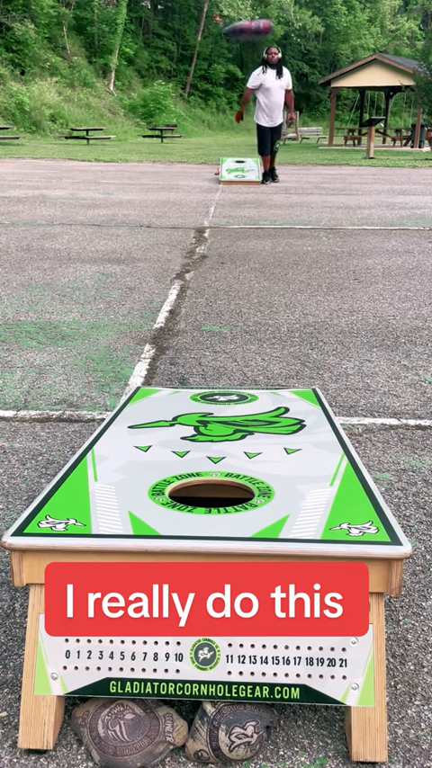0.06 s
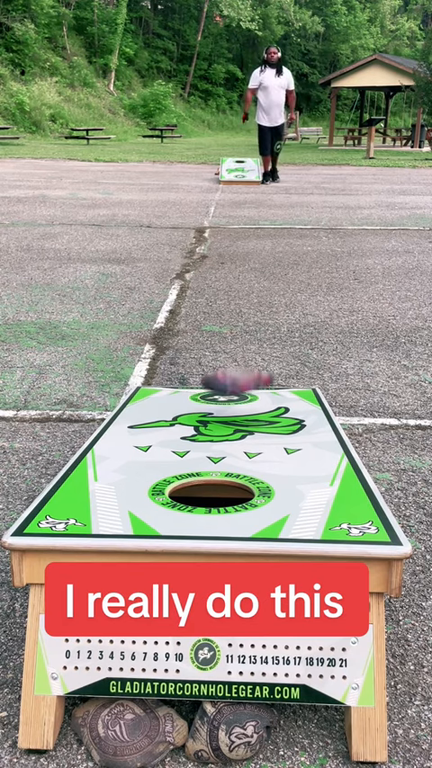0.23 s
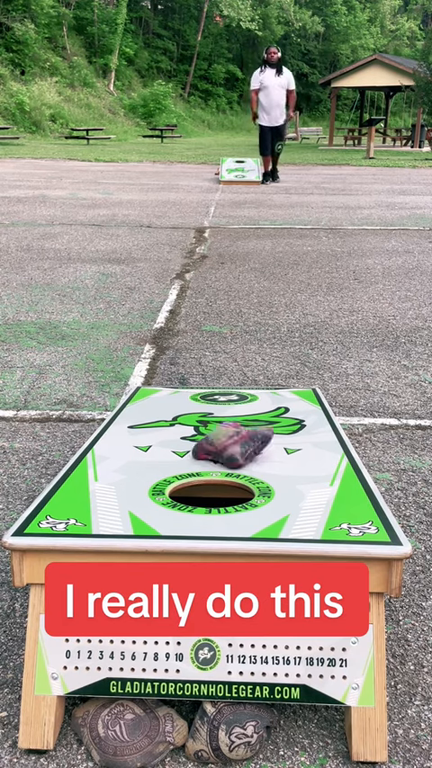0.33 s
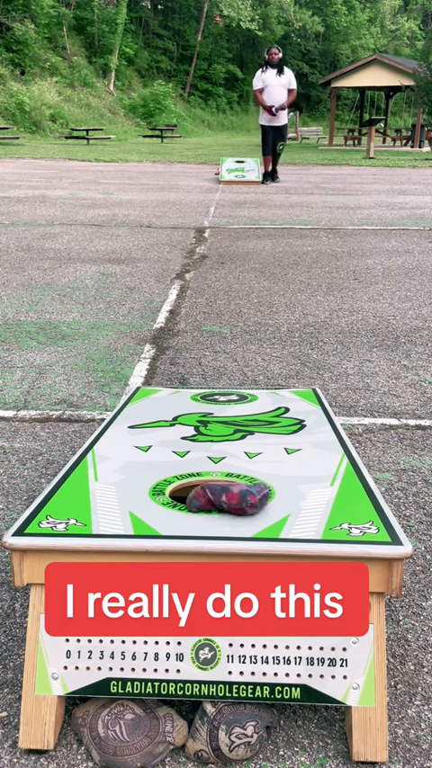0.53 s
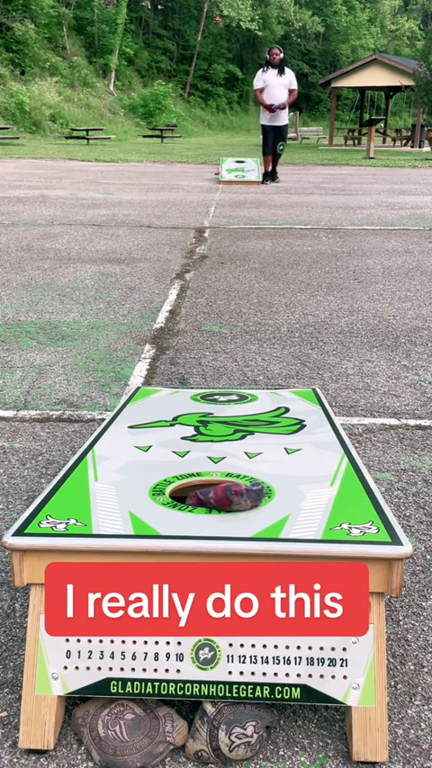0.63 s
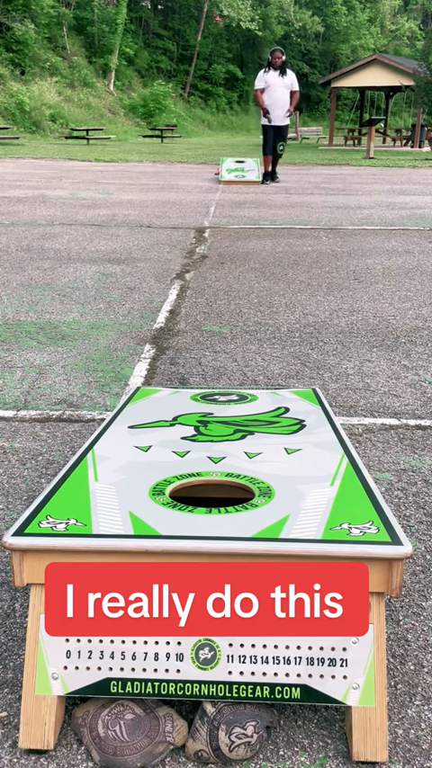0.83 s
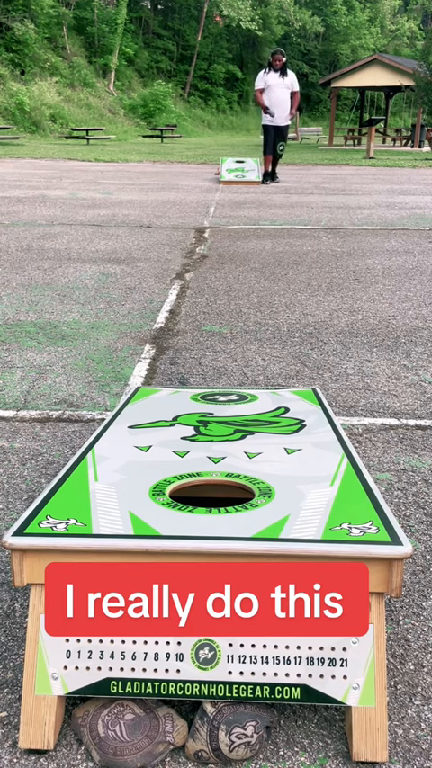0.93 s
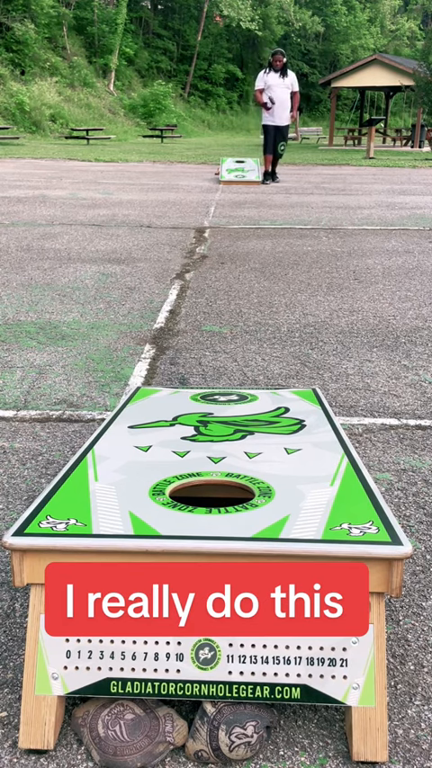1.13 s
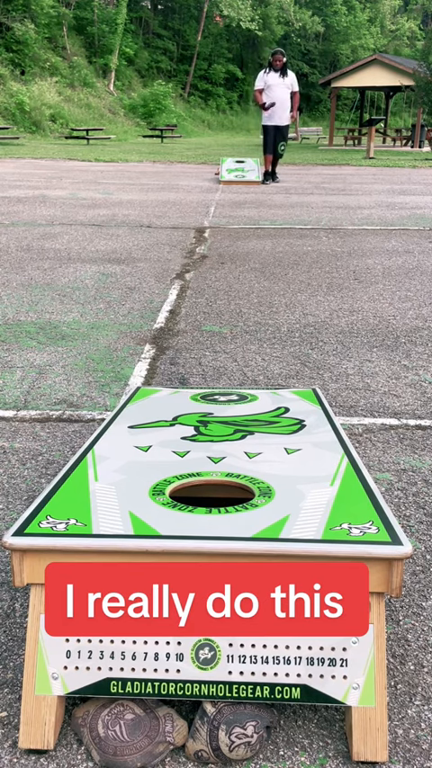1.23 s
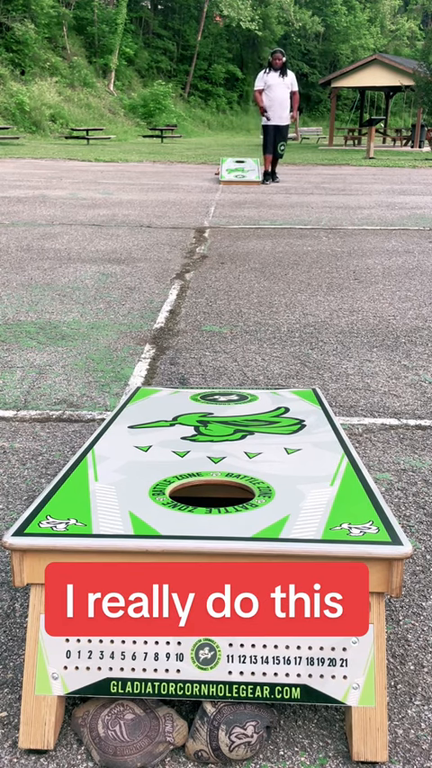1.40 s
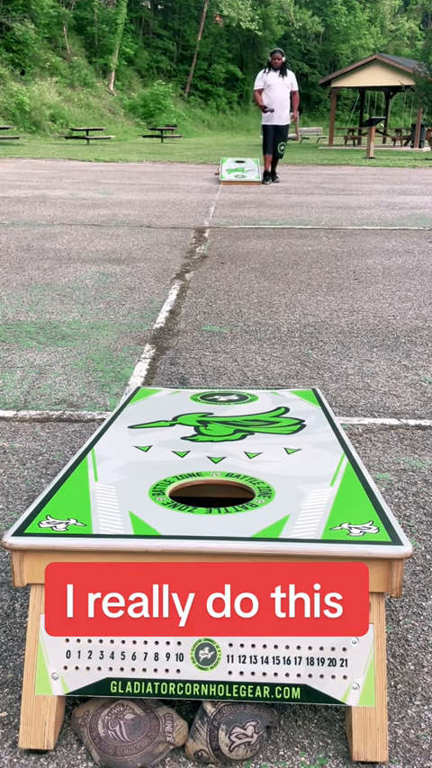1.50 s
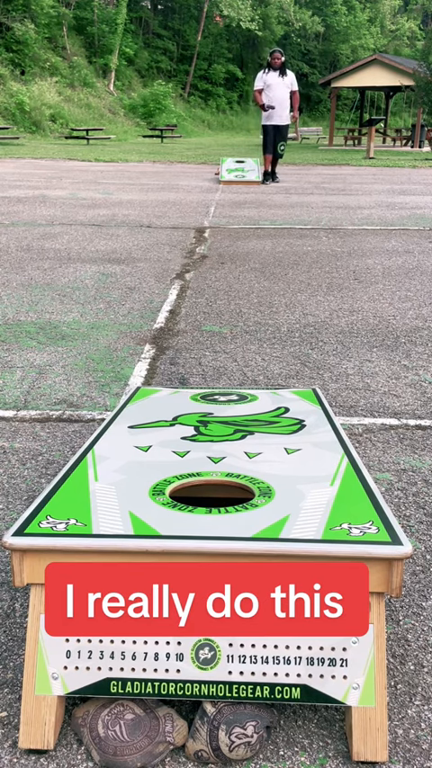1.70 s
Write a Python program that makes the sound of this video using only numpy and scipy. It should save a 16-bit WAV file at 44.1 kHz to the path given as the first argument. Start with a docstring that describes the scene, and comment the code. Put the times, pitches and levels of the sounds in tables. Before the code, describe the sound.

Sharp, close thud of a beanbag hitting a wooden board, followed by a faint slide.

```python
"""Beanbag on a plywood board

A beanbag lands close to the microphone on an open paved lot. Its edge touches, its body slaps down,
ringing the board's modes and overloading the recorder, and its weight thuds in as the pellets crunch.
The bag flops over, slides up the board with a rub of friction and slips rustling through the hole.
Behind it lie a distant wash, a low rumble and a few faint chirps."""
import sys
import numpy as np
from scipy import signal
from scipy.fft import rfft, irfft, next_fast_len
from scipy.io import wavfile
from scipy.ndimage import map_coordinates

SR = 44100
rng = np.random.default_rng(int(sys.argv[2]) if len(sys.argv) > 2 else 0)


def put_to_file(sound):
    """Save the sound as 16-bit audio at rate SR, in the file named by the first command-line argument."""
    columns = np.atleast_2d(sound).T  # one column per channel
    safe = np.clip(columns, -1, 1)
    whole_steps = np.round(safe * 32767)
    wavfile.write(sys.argv[1], SR, whole_steps.astype(np.int16))


N = 77175
MIC_TOP_HZ = 9350


def amp(db):
    """Amplitude ratio of a level in decibels."""
    return 10 ** (np.asarray(db) / 20)


def unit(x):
    """Normalisation to an rms of 1."""
    return x / np.sqrt(np.mean(x ** 2) + 1e-20)


def since(start):
    """Seconds elapsed since start, zero before it."""
    return np.maximum(np.arange(N) / SR - start, 0)


def strike(t, rise, t60):
    """Envelope of a damped impact: a quick rise, and exponential decay by 60 dB in t60 seconds."""
    return (1 - np.exp(-t / rise)) * np.exp(-np.log(1000) * t / t60)


def swell(start, attack, hold, t60):
    """Envelope of a sustained excitation: linear attack, hold and exponential release."""
    release = np.exp(-np.log(1000) * since(start + attack + hold) / t60)
    return np.minimum(since(start) / attack, 1) * release


def wobble(rate):
    """Smooth random modulation: a spline through rate Gaussian values a second."""
    knots = rng.standard_normal(int(N * rate / SR) + 4)
    return map_coordinates(knots, [np.arange(N) * rate / SR])


def filtered(x, response):
    """Linear filtering: the spectrum of x is multiplied by a frequency response."""
    size = next_fast_len(N + SR // 2)
    return irfft(rfft(x, size) * response(np.fft.rfftfreq(size, 1 / SR)), size)[:N]


def lowpass(x, cutoff_hz, order):
    """Zero-phase low-pass with a Butterworth magnitude response."""
    return filtered(x, lambda f: 1 / np.hypot(1, (f / cutoff_hz) ** order))


def noise(spectrum):
    """Coloured noise of rms 1: white noise shaped by (frequency [Hz], relative density [dB]) points."""
    hz, db = np.transpose(spectrum)
    white = rng.standard_normal(N)
    return unit(filtered(white, lambda f: amp(np.interp(np.log(f + 1), np.log(hz + 1), db))))


def outdoors():
    """Ambient noise under slow amplitude modulation: a drifting distant wash and a swaying rumble."""
    # drift of the wash (time [s], level [dB])
    wash_levels = [(0, -54.5), (0.301, -53), (1.0, -54.5), (1.4, -55.5), (1.75, -56.5)]
    # spectra of the wash and the rumble (frequency [Hz], relative density [dB])
    wash_spectrum = [(60, -5.5), (150, -0.5), (280, -8), (600, -9.5), (1000, -10), (1500, -12),
                     (2200, -23.5), (3500, -37.5), (7000, -43.5), (9500, -53), (11000, -72)]
    rumble_spectrum = [(20, -22.5), (40, -11), (58, -0.5), (85, -3.5), (140, -12), (250, -28.5),
                       (500, -60.5)]
    rumble_db, sway_db = -50.5, 0.9
    wash = amp(np.interp(since(0), *np.transpose(wash_levels))) * noise(wash_spectrum)
    rumble = amp(rumble_db + sway_db * wobble(rate=12)) * noise(rumble_spectrum)
    return wash + rumble


def birds():
    """Frequency-modulated tones swell and fade as thin whistles, like those of distant birds."""
    # chirps (time [s], duration [s], frequency [Hz], level [dB])
    chirps = [(1.03, .11, 6800, -81), (1.06, .04, 4900, -84), (1.385, .035, 5500, -84)]
    out = np.zeros(N)
    for start, duration, hz, db in chirps:
        envelope = np.sin(np.pi * np.minimum(since(start) / duration, 1))
        wavering_hz = hz * (1 + .03 * wobble(rate=900))
        out += amp(db) * envelope * np.sin(2 * np.pi * np.cumsum(wavering_hz) / SR)
    return out


def scatter(source):
    """Diffuse reflection from trees and a shelter: convolution with a decaying noise tail."""
    # spectrum of the reflections (frequency [Hz], relative density [dB])
    spectrum = [(40, -1.5), (300, -1), (1000, -8), (2500, -4), (8000, -11.5)]
    tail = noise(spectrum) * strike(since(0), rise=.02, t60=.36)
    return amp(-39.5) * signal.fftconvolve(source, tail / np.linalg.norm(tail))[:N]


def rustle():
    """Friction noise of the cloth as the bag flops, slides, drops through the hole and settles."""
    # spectrum of the cloth (frequency [Hz], relative density [dB])
    spectrum = [(300, 5.5), (1500, 3.5), (2600, -2), (3600, -2.5), (4700, -6.5), (6000, 1.5), (8000, -1),
                (9400, -3)]
    # movements of the cloth (time [s], level [dB], attack [s], hold [s], release T60 [s])
    movements = [(0.259, -60.5, 0.016, 0.028, 0.22), (0.33, -68, 0.013, .01, 0.23),
                 (0.371, -55.5, 0.038, 0.051, 0.57), (0.754, -57, 0.016, .03, 0.27),
                 (0.823, -54.5, 0.01, 0.021, 0.28), (1.474, -66.5, 0.045, 0.047, 0.32)]
    envelope = sum(amp(db) * swell(start, attack, hold, t60) for start, db, attack, hold, t60 in movements)
    return noise(spectrum) * envelope


def pellets():
    """Granular noise in damped bursts: the filling crunches on landing and shifts as the bag flops."""
    # spectrum of the pellets (frequency [Hz], relative density [dB])
    spectrum = [(300, -1), (1400, -1.5), (2000, -4.5), (2500, 6.5), (3100, -10.5), (4700, -17),
                (5700, -7.5), (7000, -16.5), (8300, -13), (9500, -20.5)]
    # crunches (time [s], level [dB])
    crunches = [(0.2423, -28.5), (0.278, -52), (0.295, -49), (.353, -59)]
    envelope = sum(amp(db) * strike(since(start), rise=.0014, t60=.063) for start, db in crunches)
    return noise(spectrum) * envelope


def board(start, bright_hz, place):
    """Modal superposition: the place (0 far end, 1 near the hole) weights the board's damped modes."""
    # modes (frequency [Hz], level struck at far end [dB], level struck near hole [dB], T60 [s], rise [s])
    modes = [(269.9, -18.5, -13.5, .2, .008), (300.2, -18, 2.5, .17, .004),
             (387.5, 4.5, -11.5, .048, 0.0027), (528, -0.5, -4.5, .088, 0.0028),
             (626.6, -12, -4, 0.057, 0.00096), (687, -8.5, -10, .056, .0006),
             (768, -14, -15.5, 0.065, 0.0008), (972.5, -18.5, -7, 0.089, .0006),
             (1073.5, -1.5, -13.5, 0.027, .0002), (1155.3, -7, -13.5, .033, .0002),
             (1284, -20, -12.5, 0.059, .0004), (1593, -4.5, -17.5, 0.022, 0.00018),
             (1690, -6, -14.5, 0.025, .0002), (2098, -13, -20.5, .01, .0003),
             (2553, -12.5, -15, .019, 0.00034)]
    t = since(start)
    out = np.zeros(N)
    for hz, far_db, hole_db, t60, rise in modes:
        gain = amp(np.interp(place, [0, 1], [far_db, hole_db]))
        rolloff = 1 / np.hypot(1, (hz / bright_hz) ** 2)  # a soft contact barely excites high modes
        out += gain * rolloff * strike(t, rise, t60) * np.sin(2 * np.pi * hz * t)
    return out


def slide():
    """Forced vibration: the uneven friction of the slowing bag sounds directly and through the board."""
    # spectrum of the friction (frequency [Hz], relative density [dB])
    spectrum = [(80, -17), (200, -1), (500, 1.5), (750, -8), (1500, -9.5), (2500, -18), (4000, -28.5),
                (9000, -41)]
    rub_db, relative_ring_db, roughness_db = -48, -10, 0.5
    rub = unit(noise(spectrum) * amp(roughness_db * wobble(rate=90)))
    impulse_response = board(0, bright_hz=MIC_TOP_HZ, place=0.45)
    ring = unit(signal.fftconvolve(rub, impulse_response)[:N])
    envelope = swell(start=.34, attack=.14, hold=.07, t60=1.61)
    return amp(rub_db) * (rub + amp(relative_ring_db) * ring) * envelope


def thud():
    """Momentum transfer: the filling arrives just after the slap and pushes the whole board down."""
    # heavily damped modes of the board on its legs (frequency [Hz], level [dB], T60 [s])
    modes = [(110, 2.5, .03), (181.4, 5, .03)]
    t = since(.241)
    return -sum(amp(db) * strike(t, rise=.0014, t60=t60) * np.sin(2 * np.pi * hz * t)
                for hz, db, t60 in modes)


def landing():
    """Impact excitation: each contact rings the board and smacks the cloth; softer ones are duller."""
    # contacts (time [s], strength [dB], brightness [Hz], smack level [dB], place [0 far end to 1 hole])
    contacts = [(0.225, -19.5, 2800, -22, 0), (.2297, -4, 600, -34, 0.04), (0.2324, 1, 4000, -14.5, 0.01),
                (0.2907, -30, 600, -55, 0.47), (0.337, -42, 500, -60, 1), (.413, -34, 1500, -46.5, 1),
                (.562, -38, 500, -49, 0.53)]
    # spectrum of the cloth smack (frequency [Hz], relative density [dB])
    spectrum = [(200, -2.5), (900, -5.5), (2000, 0.5), (2700, 0), (3200, -16), (4500, -19), (5400, -6.5),
                (6600, -16.5), (9000, -24.5)]
    out = np.zeros(N)
    for start, db, bright_hz, smack_db, place in contacts:
        smack = lowpass(noise(spectrum), cutoff_hz=2.2 * bright_hz, order=4)
        envelope = strike(since(start), rise=.00058, t60=.037)
        out += amp(db) * board(start, bright_hz, place) + amp(smack_db) * smack * envelope
    return out


def scene():
    """Superposition of the bag's direct sound, its faint reflections and the background, in mono."""
    bag = landing() + thud() + pellets() + rustle() + slide()
    return (bag + scatter(bag) + outdoors() + birds())[None]


def record(dry):
    """Saturation: a dull microphone's signal clips at full scale and is then band-limited."""
    knee_sharpness = 10
    dull = lowpass(dry[0], MIC_TOP_HZ, order=40)
    clipped = dull / (1 + np.abs(dull) ** knee_sharpness) ** (1 / knee_sharpness)
    return lowpass(clipped, cutoff_hz=15700, order=60)[None]


dry = scene()
out = record(dry)
put_to_file(out)
```